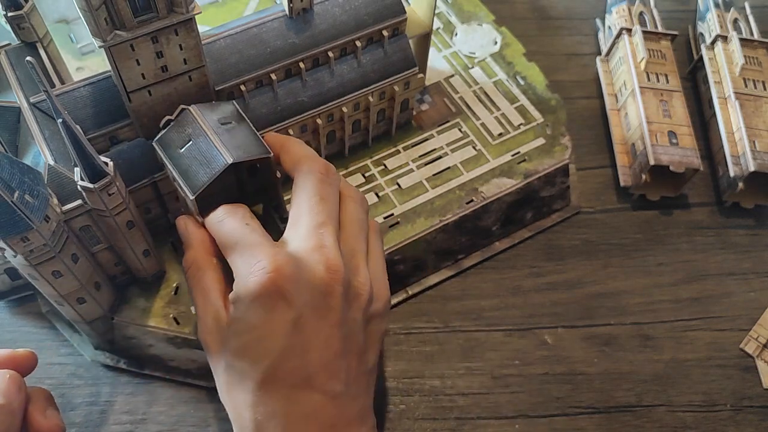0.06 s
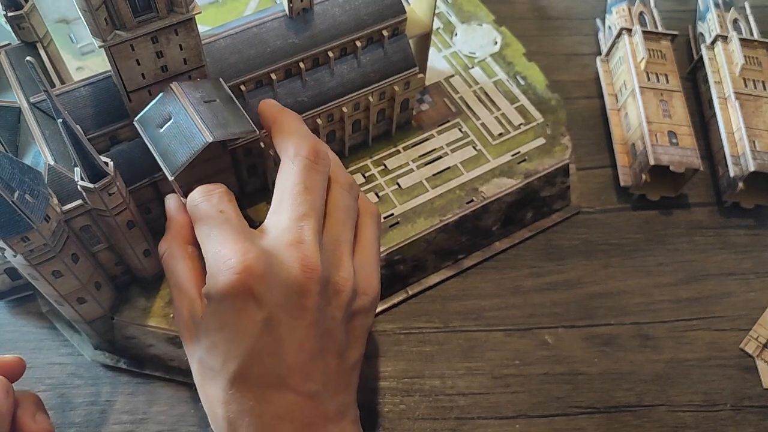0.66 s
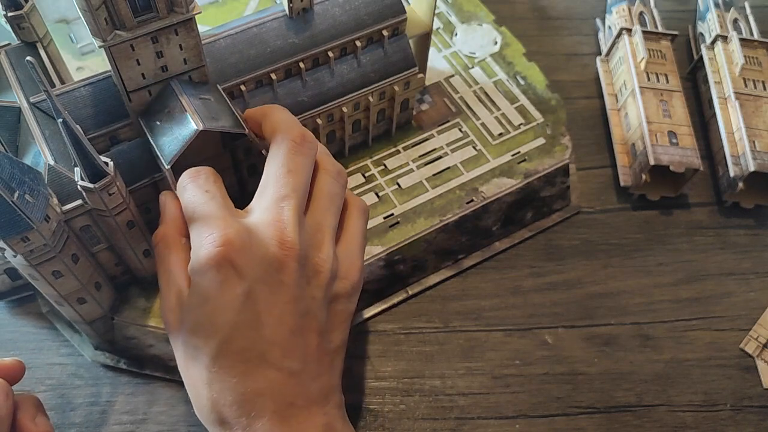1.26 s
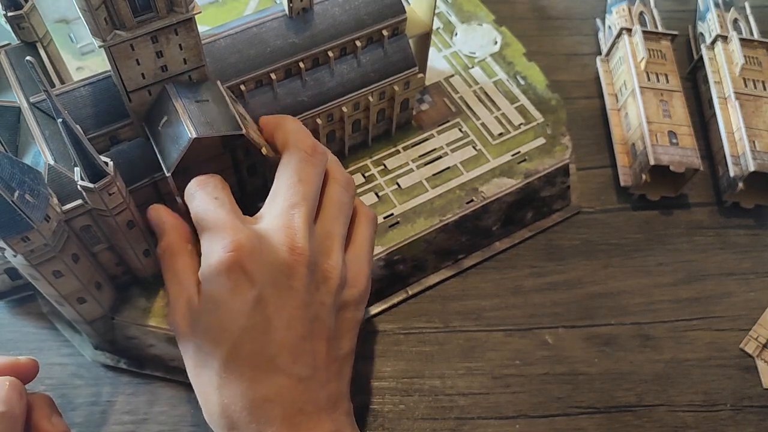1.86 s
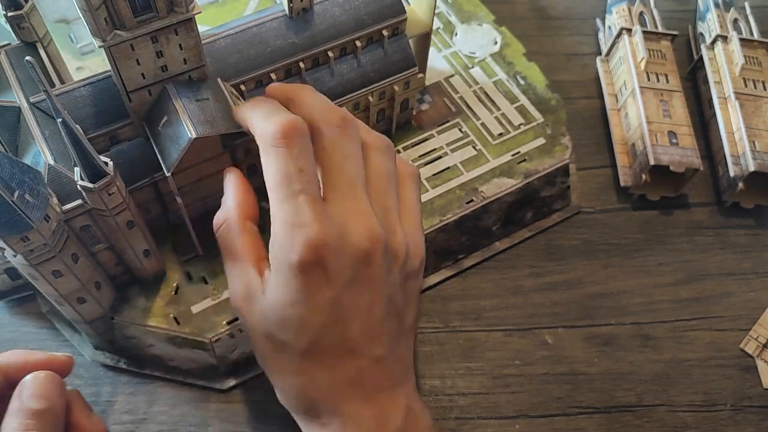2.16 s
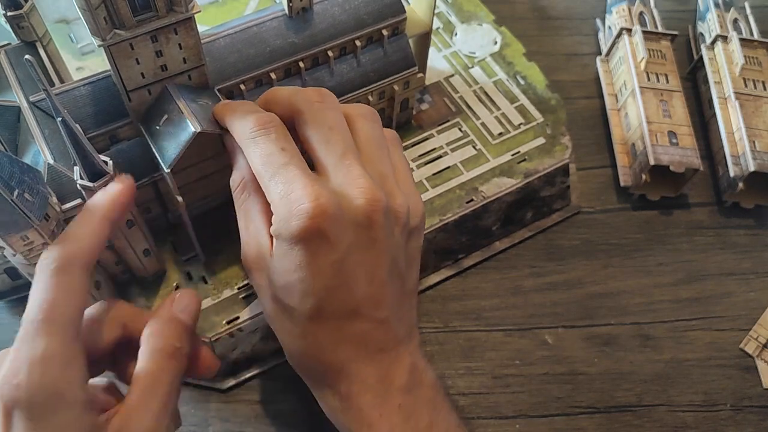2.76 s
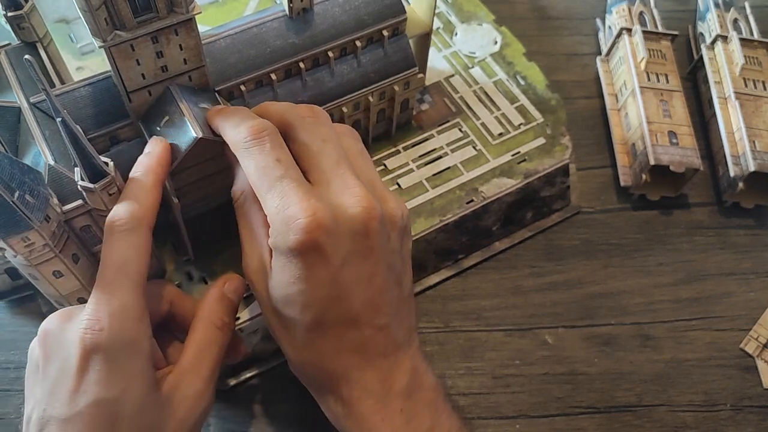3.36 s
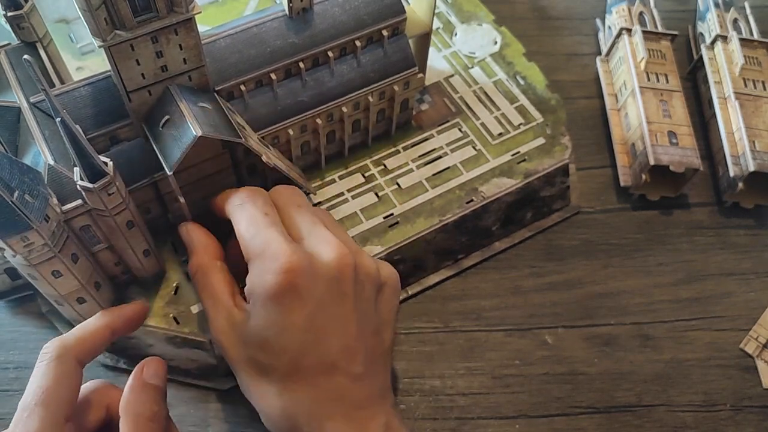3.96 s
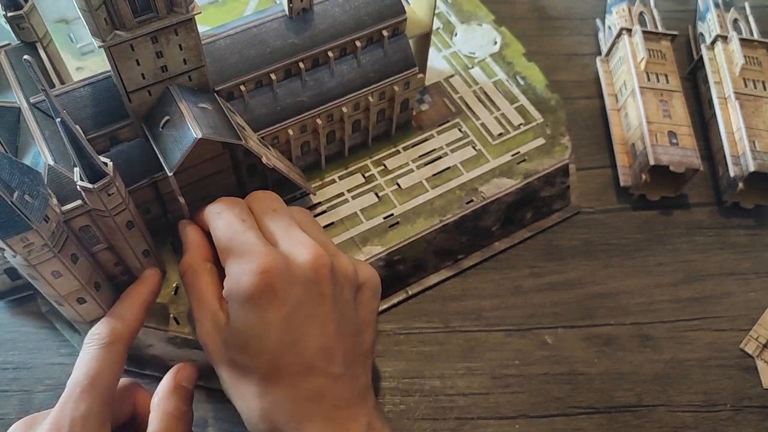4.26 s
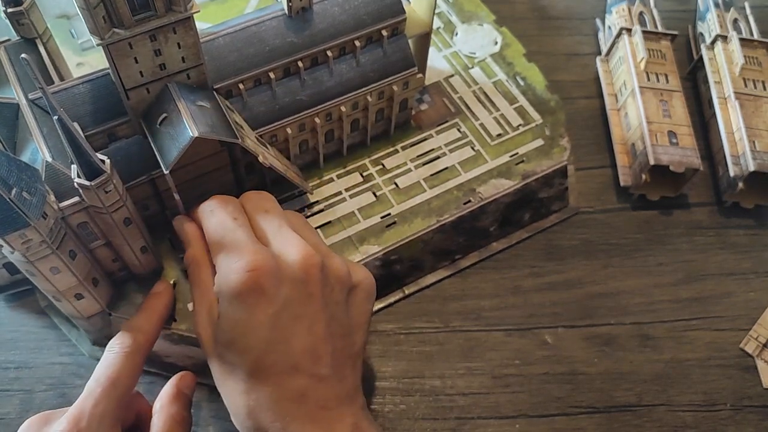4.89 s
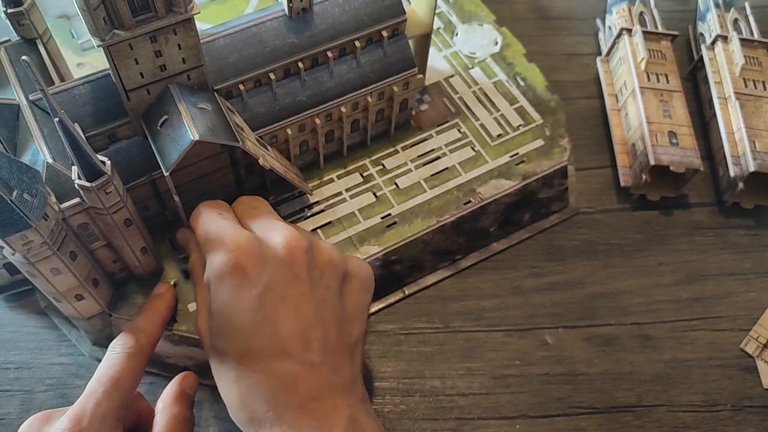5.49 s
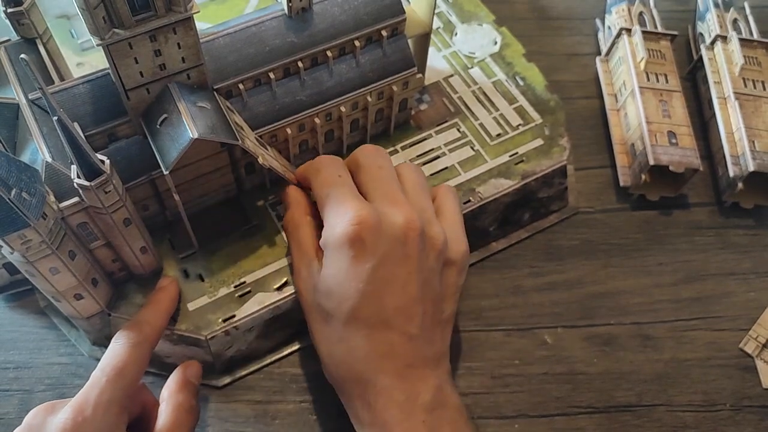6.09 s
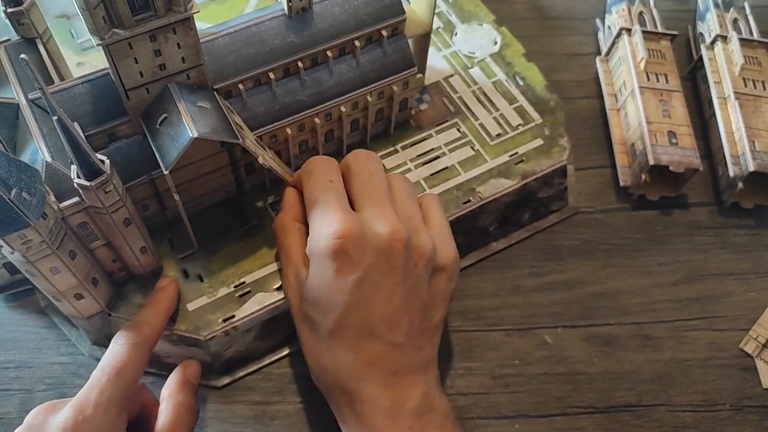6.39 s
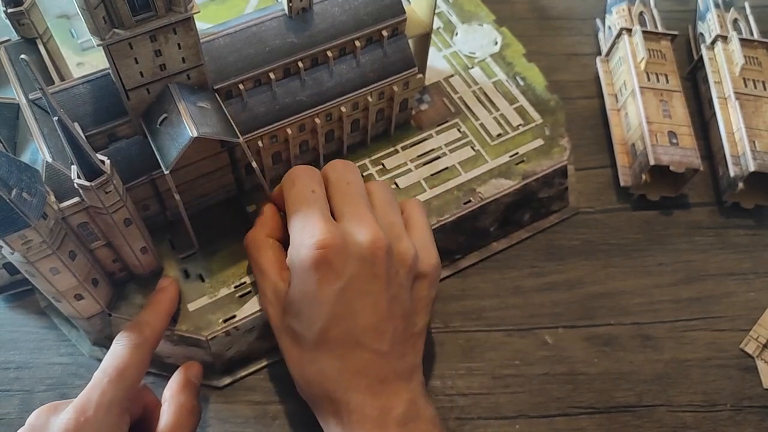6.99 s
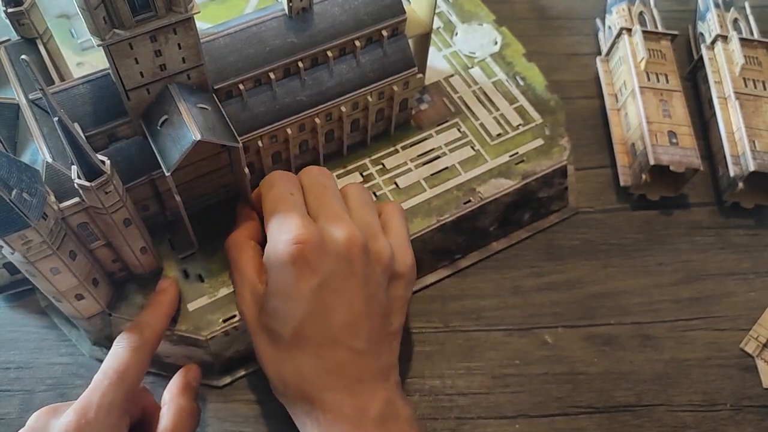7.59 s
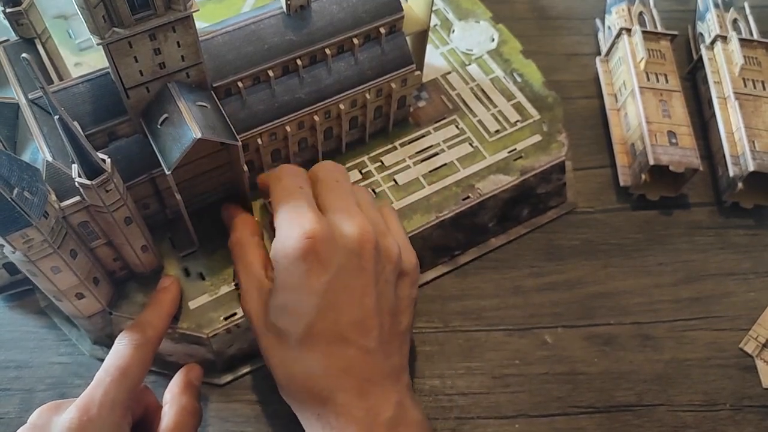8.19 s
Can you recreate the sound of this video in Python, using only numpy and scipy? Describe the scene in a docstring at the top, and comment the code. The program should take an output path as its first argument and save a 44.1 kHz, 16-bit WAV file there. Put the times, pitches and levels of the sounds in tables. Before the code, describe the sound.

Over a quiet, steady machine hum in a small room, fingers rub and tap the stiff card of a model building, close to the microphone and slightly left. One tab clicks into place, then another more loudly. Card slides through a slot, crackling, ticking and briefly groaning. After a short creak comes a crisp cluster of three clicks, followed by a few soft rubs and hollow knocks.

```python
"""Hands fit printed cardboard pieces into a model building on a wooden table, in a small live room.
A machine hums throughout. Fingers rub and tap the hollow card; tabs snap home at 1.3 s and 2.8 s.
From 4.5 s to 5.8 s a wall is pushed along its slot, crackling, ticking and groaning.
A joint creaks at 6.2 s, a tab snaps home in three quick clicks near 7 s, and light handling follows.
Blows and friction ring three parts: the hollow low sound (box), the touched panel and its cut edge."""
import sys
import numpy as np
from scipy import signal
from scipy.fft import rfft, irfft
from scipy.io import wavfile

SR = 44100
rng = np.random.default_rng(int(sys.argv[2]) if len(sys.argv) > 2 else 0)


def master_out(mix):
    """Clip the mix to full scale and print it as 16-bit PCM to the path in sys.argv[1]."""
    frames = np.transpose(np.atleast_2d(mix))
    ceiling = np.clip(frames, -1, 1)
    pcm = np.round(ceiling * 32767).astype(np.int16)
    wavfile.write(sys.argv[1], SR, pcm)


N = 363825


def amp(db):
    """Decibels to gain."""
    return 10 ** (np.asarray(db) / 20)


def unit(x):
    """Scale to energy 1."""
    return x / np.sqrt(np.sum(x ** 2) + 1e-20)


def curve(points, hz):
    """Interpolate (freq_hz, value) rows on a log-frequency axis."""
    freq_hz, value = np.transpose(points)
    return np.interp(np.log(hz + 1), np.log(freq_hz + 1), value)


def add(mix, start_s, sound):
    """Mix in a stereo sound at start_s."""
    part = mix[:, max(round(start_s * SR), 0):][:, :sound.shape[1]]
    part += sound[:, :part.shape[1]]


def bell(hz, centre_hz, width_hz):
    """Resonance shape, 1 at its centre."""
    return 1 / (1 + (2 * (hz - centre_hz) / width_hz) ** 2)


def vary(hz, octaves):
    """Random pitch within +/- octaves of hz."""
    return hz * 2 ** (octaves * (2 * rng.random() - 1))


def impulse_response(gain_db):
    """Minimum-phase response of a passive body with this gain curve."""
    size = len(gain_db)
    log_gain = np.log(amp(np.r_[gain_db, gain_db[-2:0:-1]]))
    spectrum = np.exp(np.conj(signal.hilbert(log_gain)))
    return irfft(spectrum[:size])[:size]


def place(x, left_db, start_s=0):
    """Pan left of centre: the right microphone lags, less from 6 s as the hands move inward."""
    lag_samples = 9 if start_s < 6 else 7
    left, right = np.sqrt(2) * unit(amp([left_db / 2, -left_db / 2]))
    return np.array([left * x, right * np.r_[np.zeros(lag_samples), x[:-lag_samples]]])


# freq_hz, coherence
MIC_COHERENCE = [(60, 0.73), (130, 1), (290, 0.75), (450, 0.76), (650, 0.11), (1300, 0.15), (3000, 0.24),
                 (7000, 0.086)]


def diffuse_noise(size):
    """Diffuse field at two close microphones: alike in the bass, nearly unrelated above."""
    left, other = rfft(rng.standard_normal((2, size)))
    coherence = curve(MIC_COHERENCE, np.fft.rfftfreq(size, 1 / SR))
    right = coherence * left + np.sqrt(1 - coherence ** 2) * other
    return irfft(np.array([left, right]), size)


# freq_hz, density_db_per_hz
AIR_SPECTRUM = [(20, -101.5), (50, -94.5), (85, -78.5), (120, -84), (180, -77.5), (255, -86), (300, -86),
                (420, -86.5), (580, -89.5), (1000, -103), (2000, -107), (6000, -113), (7500, -115),
                (15000, -115)]
# freq_hz, width_hz, boost_db
ROOM_MODES = [(146.6, 21.6, 9.5), (241.4, 11.6, 13), (422.5, 9.5, 8.5)]
# pitch_hz, rms_db
HUM_TONES = [(39.8, -61.5), (265, -65.5)]


def machine(air_left_db=0.3):
    """Steady tones in dull air noise that booms at a few room modes."""
    hz, t = np.fft.rfftfreq(N, 1 / SR), np.arange(N) / SR
    air_db = curve(AIR_SPECTRUM, hz) + sum(db * bell(hz, f, width) for f, width, db in ROOM_MODES)
    air = irfft(rfft(diffuse_noise(N)) * amp(air_db), N) * np.sqrt(SR / 2)
    hum = sum(np.sqrt(2) * amp(db) * np.sin(2 * np.pi * (f * t + rng.random())) for f, db in HUM_TONES)
    return air * amp([[air_left_db / 2], [-air_left_db / 2]]) + place(hum, left_db=1.3)


# freq_hz, t60_s
REVERB_DECAY = [(250, 0.07), (700, 0.45), (2000, 0.33), (5000, 0.37), (9000, 0.35), (15000, 0.27)]
# freq_hz, gain_db
REVERB_GAIN = [(250, 5), (700, -7), (1500, -2.5), (3000, -2), (6000, -3), (9000, -9), (15000, -10)]


def reverb_response(onset_s=0.00088, rise_s=0.00025, size=32768):
    """Room response to one spot on the table; each band dies at its own rate."""
    hz, t, bands = signal.stft(diffuse_noise(size), SR, nperseg=256)
    decay_per_s = np.log(1000) / curve(REVERB_DECAY, hz)[:, None]
    gain = np.sqrt(2 * decay_per_s / SR) * amp(curve(REVERB_GAIN, hz))[:, None]
    tail = signal.istft(bands * gain * np.exp(-decay_per_s * t), SR)[1][:, :size]
    return tail * np.clip((np.arange(size) / SR - onset_s) / rise_s, 0, 1)


def room(x, echo_db=-14, echo_s=0.0078, spots=4, rounds_per_s=0.9):
    """One echo off a near surface, plus reverb that shifts as the hands move from spot to spot."""
    rounds = rounds_per_s * np.arange(N) / SR
    shares = [np.maximum(np.cos(2 * np.pi * (rounds + k / spots)), 0) for k in range(spots)]
    out = sum(signal.oaconvolve(x[:1] * share, reverb_response(), axes=1)[:, :N] for share in shares)
    add(out, echo_s, amp(echo_db) * x)
    return out


# freq_hz, gain_db
BOX_SPECTRUM = [(150, -40.5), (330, -8.5), (450, -0.5), (550, 2), (720, 3), (1000, -5), (1300, -10),
                (1700, -24), (3500, -67)]
# freq_hz, width_hz, boost_db
LOW_RESONANCES = [(534, 48, 2), (860, 110, 1), (987, 65, 8.5), (1260, 160, 9)]


def box_colour_db(hz, ring_hz, q, peak_db):
    """The hollow low sound: fixed resonances of room and base, plus the one this touch stirs."""
    modes_db = sum(db * bell(hz, f, width) for f, width, db in LOW_RESONANCES)
    return curve(BOX_SPECTRUM, hz) + modes_db + peak_db * bell(hz, ring_hz, ring_hz / q)


# freq_hz, gain_db
PANEL_SPECTRUM = [(700, -46), (1300, -3.5), (1900, -1), (2900, 0), (4200, -2.5), (5200, -4), (6200, -3.5),
                  (7400, -18), (11000, -30.5)]


def panel_colour_db(hz, ring_hz, over_edge_db, q, peak_db, knee_hz=3000):
    """A ringing panel: the weaker the edge's share, the more the fingertip cushions its treble."""
    cushion_db_per_oct = 0.98 * np.clip(over_edge_db - 5, 0, 18)
    cushion_db = cushion_db_per_oct * np.log2(np.maximum(hz / knee_hz, 1))
    return curve(PANEL_SPECTRUM, hz) - cushion_db + peak_db * bell(hz, ring_hz, ring_hz / q)


# freq_hz, gain_db
EDGE_SPECTRUM = [(4500, -49.5), (6500, 1.5), (7500, -1.5), (8600, 4), (10500, 3.5), (13200, 8.5),
                 (16000, -2)]


def edge_colour_db(hz, ring_hz, level_db, width_hz=1100, soft_db=-48, hard_db=-27):
    """The stiff cut edge: hard blows reach its overtone, light ones roll off above its first ring."""
    hardness = np.clip((level_db - soft_db) / (hard_db - soft_db), 0, 1)
    ring_db = 10 * bell(hz, ring_hz, width_hz)
    overtone_db = 8 * hardness * bell(hz, 1.59 * ring_hz, width_hz)
    rolloff_db = 14 * (1 - hardness) * np.log2(np.maximum(hz / ring_hz, 1))
    return curve(EDGE_SPECTRUM, hz) + ring_db + overtone_db - rolloff_db


def friction(slides, slips_per_s=1100, spread_db=4, noise_gain=0.68, trim_db=-4.5, size=1024):
    """Sliding card catches and slips in tiny uneven steps that drive box, panel and edge."""
    hz = np.fft.rfftfreq(2 * size - 2, 1 / SR)
    tilt_db = -4 * np.log2(1 + hz / 1500)  # duller than a snap
    edge = impulse_response(curve(EDGE_SPECTRUM, hz) + tilt_db)
    slip_gain = amp(spread_db * np.minimum(rng.exponential(1, N), 4))
    slips = slip_gain * (rng.random(N) < slips_per_s / SR) * rng.choice([-1, 1], N)
    roughness = unit(slips) + noise_gain * unit(rng.standard_normal(N))
    out = np.zeros((2, N))
    for start_s, push, box_db, panel_db, edge_db, box_hz, panel_hz in slides:
        box = impulse_response(box_colour_db(hz, box_hz, q=5, peak_db=6) + tilt_db)
        colour_db = panel_colour_db(hz, panel_hz, panel_db - edge_db, q=6, peak_db=6)
        panel = impulse_response(colour_db + tilt_db)
        force = roughness[round(start_s * SR):][:len(push)]
        force = force * push[:len(force)]
        for body, db, left_db in [(box, box_db, 1.2), (panel, panel_db, 1.3), (edge, edge_db, 3.5)]:
            sound = np.sqrt(len(force)) * unit(signal.fftconvolve(force, body))
            add(out, start_s, amp(db + trim_db) * place(sound, left_db, start_s))
    return out


def contact_force(contact_ms, linger_gain=0.91, linger_ms=1.3, size=1024):
    """Fibres give way in a quick swell and linger briefly."""
    t_ms = np.arange(size) * 1000 / SR
    swell = 2.09 * t_ms / contact_ms
    envelope = swell * np.exp(1 - swell) + linger_gain * np.exp(-t_ms / linger_ms)
    force = rng.standard_normal(size) * envelope
    for _ in range(3):  # flatten the spectrum, keep the burst short
        whitened = irfft(np.exp(1j * np.angle(rfft(force))))
        force = whitened * envelope ** 0.25
    return force


def strike(blows, rattle_s=0.0066, ripple_db=3, size=2048):
    """Each blow rings box, panel and edge; levels are powers over 10 ms."""
    hz, t = np.fft.rfftfreq(2 * size - 2, 1 / SR), np.arange(size) / SR
    out = np.zeros((2, N))
    for start_s, contact_ms, box_db, panel_db, edge_db, box_hz, panel_hz, edge_hz, edge_left_db in blows:
        # each touched spot favours other modes
        spot_db = ripple_db * signal.resample(rng.standard_normal(48), size)
        colour_db = panel_colour_db(hz, panel_hz, panel_db - edge_db, q=1.5, peak_db=5)
        panel = impulse_response(colour_db + spot_db)
        edge = impulse_response(edge_colour_db(hz, edge_hz, edge_db))
        box = impulse_response(box_colour_db(hz, box_hz, q=6.7, peak_db=12))
        # the blow rattles on through the joined walls
        rattle = unit(rng.standard_normal(size) * np.exp(-t / rattle_s))
        box = box + signal.fftconvolve(box, rattle)[:size]
        force = contact_force(contact_ms)
        parts = [(box, box_db, 1.2), (panel, panel_db, 1.3), (edge, edge_db, edge_left_db)]
        for body, db, left_db in parts:
            sound = np.sqrt(0.01 * SR) * unit(signal.fftconvolve(force, body))
            add(out, start_s, amp(db) * place(sound, left_db, start_s))
    return out


def touch(start_s, contact_ms, box_db, panel_over_box_db, box_hz, edge_over_panel_db, edge_left_db=12):
    """One blow on a random spot of a wall, which sets the pitch of panel and edge."""
    panel_hz, edge_hz = vary(2095, octaves=0.5), vary(10350, octaves=0.5)
    panel_db = box_db + panel_over_box_db
    edge_db = panel_db + edge_over_panel_db
    return start_s, contact_ms, box_db, panel_db, edge_db, box_hz, panel_hz, edge_hz, edge_left_db


# start_s, end_s, box_db (before trim_db), panel_over_box_db, box_hz
RUB_STROKES = [(0, 0.105, -56.5, -5.5, 1140), (1.123, 1.197, -54, -8, 656), (1.197, 1.32, -59, -8, 620),
               (1.443, 1.54, -55.5, -5, 724), (1.619, 1.696, -56.5, -4, 700),
               (1.889, 1.962, -52.5, -4.5, 530), (1.931, 2.016, -50.5, -4.5, 546),
               (2.295, 2.326, -47, -6, 573), (2.412, 2.449, -49, -2, 553), (2.766, 2.833, -51, -17, 670),
               (3.155, 3.267, -62, 0, 534), (3.421, 3.447, -52, 2, 660), (3.456, 3.474, -49, 5, 610),
               (3.487, 3.755, -58.5, -7.5, 666), (4.236, 4.417, -60.5, -6.5, 680),
               (4.288, 4.306, -49.5, -5.5, 680), (6.133, 6.197, -55.5, -6.5, 616),
               (6.4, 6.421, -50.5, -9.5, 560), (6.951, 6.981, -37, -13, 534),
               (7.425, 7.479, -57.5, -5.5, 788), (7.583, 7.69, -49.5, -12, 520),
               (7.674, 7.747, -45.5, -7.5, 540), (7.876, 7.933, -57.5, -6.5, 550),
               (8.048, 8.233, -58, -7, 520)]


def rubs(fade_share=0.23, edge_over_panel_db=-7.5, panel_hz=2070):
    """Short slides of card on card or skin; each swells, holds and fades."""
    slides = []
    for start_s, end_s, box_db, panel_over_box_db, box_hz in RUB_STROKES:
        push = signal.windows.tukey(round((end_s - start_s) * SR), fade_share)
        panel_db = box_db + panel_over_box_db
        slides.append((start_s, push, box_db, panel_db, panel_db + edge_over_panel_db, box_hz, panel_hz))
    return slides


# time_s, friction_db (before trim_db)
WALL_PUSHES = [(4.45, -64.5), (4.6, -60), (4.96, -61), (5.0, -58), (5.075, -47.5), (5.11, -80), (5.2, -54),
               (5.29, -68.5), (5.35, -50.5), (5.46, -56), (5.51, -73), (5.575, -72), (5.6, -54),
               (5.66, -64.5), (5.83, -67)]


def wall_slide(box_hz=820, panel_hz=1860):
    """A wall is worked along its slot; friction follows the push of the hand."""
    time_s, friction_db = np.transpose(WALL_PUSHES)
    push = amp(np.interp(np.arange(time_s[0], time_s[-1], 1 / SR), time_s, friction_db))
    box_db = 10 * np.log10(np.mean(push ** 2))
    panel_db, edge_db = box_db - 3.5, box_db - 12.5
    return [(time_s[0], push, box_db, panel_db, edge_db, box_hz, panel_hz)]


def crackle(count=56, offset_db=-12.5, spread_db=6.5, contact_ms=1.9):
    """Fibres give way at random as the wall slides, louder under a harder push."""
    time_s, friction_db = np.transpose(WALL_PUSHES)
    starts_s = time_s[0] + (time_s[-1] - time_s[0]) * (np.arange(count) + rng.random(count)) / count
    push_db = np.interp(starts_s, time_s, friction_db)
    levels_db = push_db + offset_db + spread_db * rng.standard_normal(count)
    return [touch(start_s, contact_ms, box_db, panel_over_box_db=4.5,
                  box_hz=vary(820, octaves=0.46), edge_over_panel_db=-9.5)
            for start_s, box_db in zip(starts_s, levels_db)]


# start_s, length_s, pitch_hz, width_hz, rms_db
SQUEAKS_AND_RUBS = [(1.506, 0.006, 5500, 350, -62.5), (1.654, 0.0073, 5550, 400, -57),
                    (2.428, 0.012, 13400, 900, -48), (3.424, 0.025, 5520, 400, -55.5),
                    (4.991, 0.066, 733, 159, -50), (5.838, 0.049, 2220, 1350, -56.5),
                    (6.15, 0.011, 13200, 1300, -49), (7.595, 0.0053, 4000, 400, -53),
                    (7.681, 0.044, 550, 200, -50.5)]


def squeaks_and_rubs(fade_share=0.34, left_db=0.45):
    """Short bands of friction noise: narrow squeaks, low groans and one broad rub of skin on card."""
    hz, out = np.fft.rfftfreq(SR, 1 / SR), np.zeros((2, N))
    for start_s, length_s, pitch_hz, width_hz, rms_db in SQUEAKS_AND_RUBS:
        size = round(length_s * SR)
        band = irfft(rfft(rng.standard_normal(SR)) * bell(hz, pitch_hz, width_hz))[:size]
        burst = np.sqrt(size) * unit(band * signal.windows.tukey(size, fade_share))
        add(out, start_s, amp(rms_db) * place(burst, left_db, start_s))
    return out


# start_s, edge_db
TAB_TICKS = [(2.906, -45), (2.914, -46), (4.597, -55.5), (4.637, -54.5), (4.666, -58), (4.71, -60),
             (4.793, -59), (4.828, -62), (4.862, -65), (4.948, -60.5), (5.084, -57.5), (5.192, -61),
             (5.281, -60.5), (5.389, -66), (6.246, -61.5), (6.751, -62), (7.651, -53.5), (7.715, -58.5)]


def ticks(contact_ms=0.65, edge_hz=8900, left_db=11.5):
    """A tab ticks along its slot: tiny blows on its cut edge, which rings at one pitch."""
    blows = []
    for start_s, edge_db in TAB_TICKS:
        box_db, panel_db = edge_db - 0.5, edge_db - 2.5
        box_hz, panel_hz = vary(950, octaves=0.46), vary(1830, octaves=0.5)
        blows.append((start_s, contact_ms, box_db, panel_db, edge_db, box_hz, panel_hz, edge_hz, left_db))
    return blows


def creak(start_s=6.155, gap_s=0.0112, contact_ms=2.2, box_hz=690, panel_hz=4300, edge_hz=14100,
          left_db=7):
    """A tight joint slips four times at an even pace, weaker as its strain runs out."""
    blows = []
    for k in range(4):
        slip_s, edge_db = start_s + k * gap_s, -47 - 2.5 * k
        box_db, panel_db = edge_db - 5.5, edge_db - 1.5
        blows.append((slip_s, contact_ms, box_db, panel_db, edge_db, box_hz, panel_hz, edge_hz, left_db))
    return blows


# start_s, box_db, panel_over_box_db, box_hz
CARD_TAPS = [(1.667, -53.5, 2, 690), (1.944, -50, 2, 970), (1.965, -46.5, -7, 547), (2.419, -47, -7, 715),
             (2.436, -52.5, -3, 540), (2.736, -50, -3.5, 700), (3.185, -59.5, -0.5, 496),
             (3.469, -42, -6, 595), (3.638, -54, 2, 700), (3.653, -47.5, 0.5, 665), (3.719, -52.5, -3, 566),
             (4.296, -46.5, -5.5, 684), (4.797, -50.5, -4, 1130), (4.852, -52, 5, 990),
             (4.889, -47.5, -5, 1260), (5.097, -63.5, 10.5, 1310), (5.147, -48.5, -2.5, 1070),
             (5.385, -48.5, -5, 460), (5.45, -49.5, -6, 1130), (5.643, -54.5, -2.5, 653),
             (5.791, -62.5, 3.5, 480), (6.417, -55, -2, 1030), (6.695, -58, 1, 1240),
             (7.297, -53.5, -9, 720), (7.946, -48.5, -12, 550), (8.1, -62.5, 4.5, 476)]


def taps(contact_ms=2.6):
    """Card meets card in crisp blows."""
    return [touch(start_s, contact_ms, box_db, panel_over_box_db, box_hz, edge_over_panel_db=-7)
            for start_s, box_db, panel_over_box_db, box_hz in CARD_TAPS]


# start_s, contact_ms, box_db, panel_over_box_db, box_hz
FINGER_KNOCKS = [(0.06, 1.3, -46.5, -24, 865), (0.073, 6.2, -48.5, -9.5, 1120),
                 (0.831, 5.5, -48.5, -27, 540), (0.992, 5.7, -61, -20, 1050), (2.307, 4.8, -38, -19, 542),
                 (2.695, 4.4, -49, -13, 506), (3.365, 3.8, -44, -16, 710), (3.984, 2.6, -53.5, -12, 1110),
                 (4.647, 4.6, -42, -6.5, 950), (4.993, 2.2, -42.5, -4.5, 730), (5.562, 6.1, -49, -5.5, 570),
                 (5.591, 5.2, -47, -11, 705), (6.263, 0.81, -45, -12.5, 532), (7.596, 3.7, -48, -3.5, 1080),
                 (8.063, 3.4, -51.5, -20, 547), (8.198, 3.8, -49.5, -8.5, 560)]


def knocks():
    """A soft fingertip knocks on the hollow model and barely stirs the edge."""
    return [touch(*row, edge_over_panel_db=-26) for row in FINGER_KNOCKS]


# start_s, contact_ms, box_db, panel_db, edge_db, box_hz, panel_hz, edge_hz, edge_left_db
TAB_SNAPS = [(1.338, 0.73, -38.5, -44, -51, 634, 3700, 9650, 15),
             (2.8203, 1.32, -29.5, -27, -29.5, 1120, 2000, 11650, 15),
             (6.919, 0.59, -32, -29, -21.5, 830, 2910, 8640, 16),
             (6.95, 0.64, -32.5, -29.5, -26.5, 755, 2780, 8860, 16.5),
             (6.9667, 1.4, -35.5, -46, -34.5, 540, 2840, 8800, -11)]


def snaps():
    """Tabs snap home: short, hard blows."""
    return strike(TAB_SNAPS)


def scene():
    """Handled card and its room sound over the machine."""
    light_blows = knocks() + taps() + creak() + ticks() + crackle()
    slides = rubs() + wall_slide()
    card = snaps() + strike(light_blows) + friction(slides) + squeaks_and_rubs()
    return card + room(card) + machine()


def record(dry, cutoff_hz=16250):
    """Soft-clip the highest peaks, then low-pass."""
    lowpass = signal.firwin(301, cutoff_hz, window=("kaiser", 8), fs=SR)
    return signal.oaconvolve(np.tanh(dry), lowpass[None], "same")


dry = scene()
out = record(dry)
master_out(out)
```